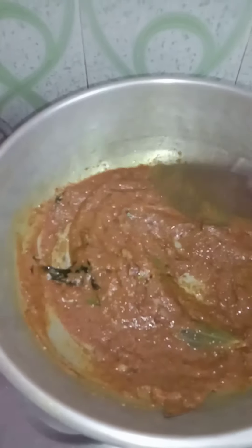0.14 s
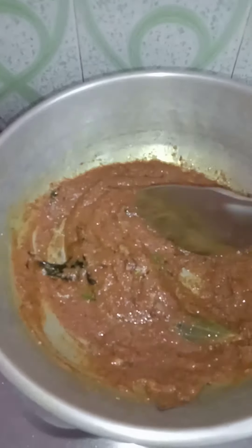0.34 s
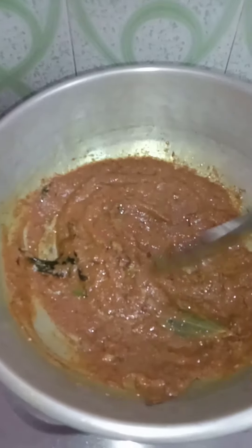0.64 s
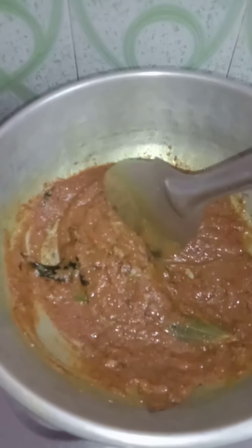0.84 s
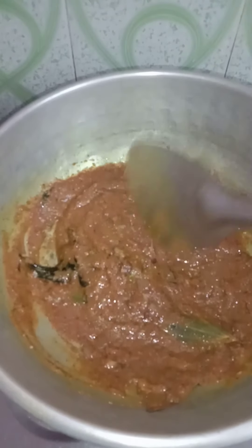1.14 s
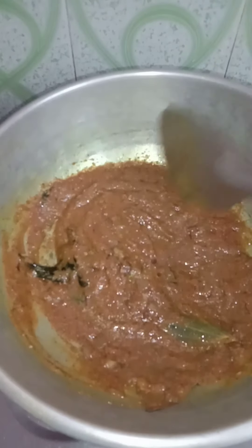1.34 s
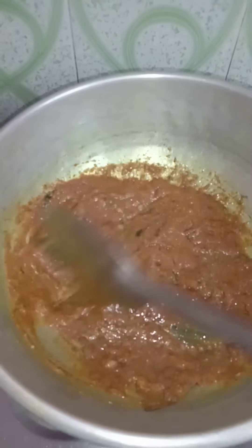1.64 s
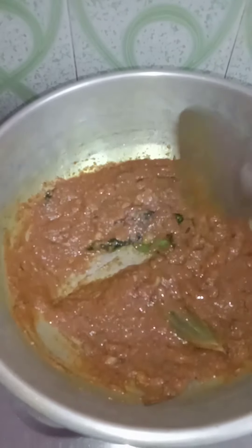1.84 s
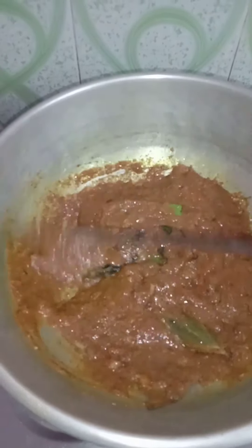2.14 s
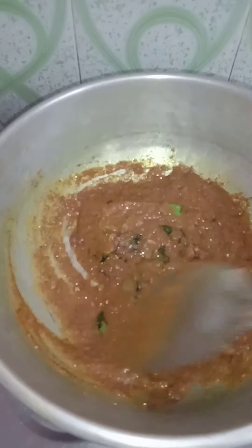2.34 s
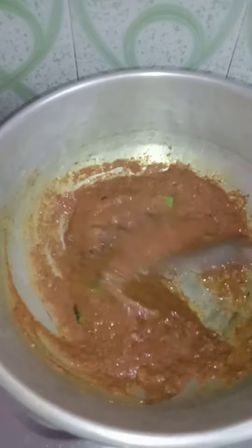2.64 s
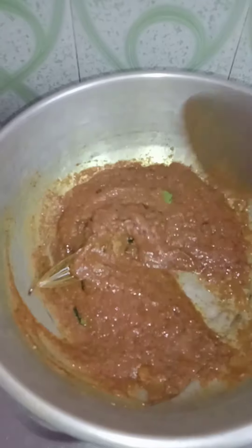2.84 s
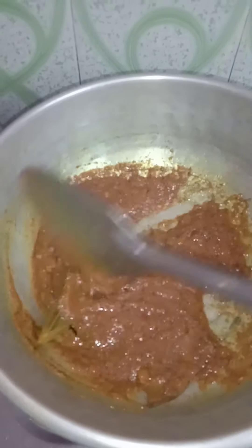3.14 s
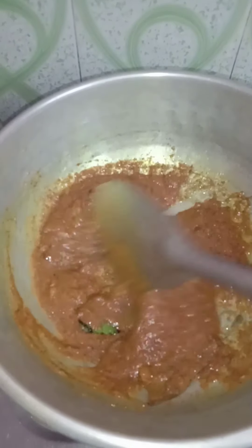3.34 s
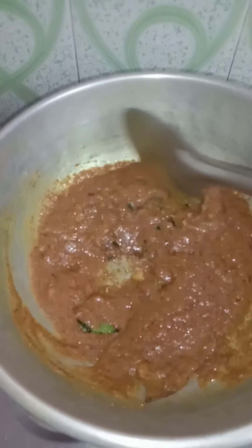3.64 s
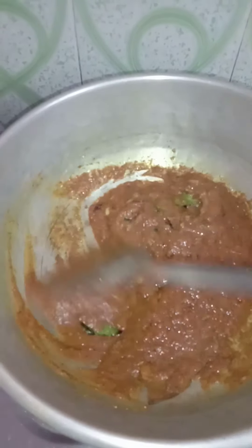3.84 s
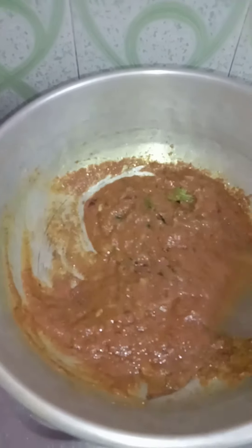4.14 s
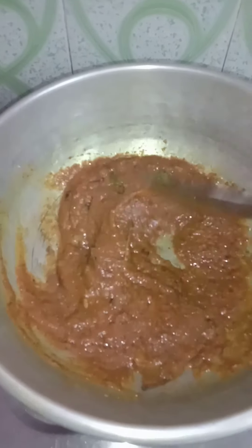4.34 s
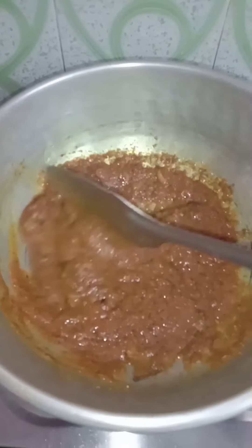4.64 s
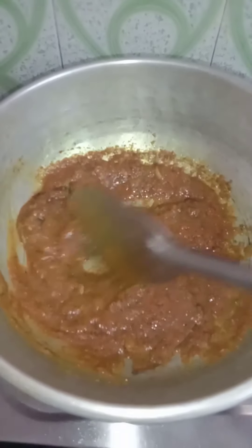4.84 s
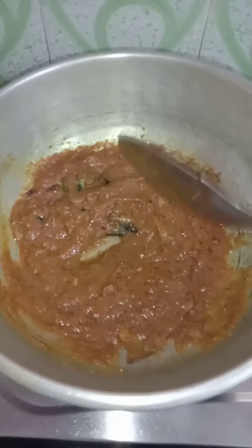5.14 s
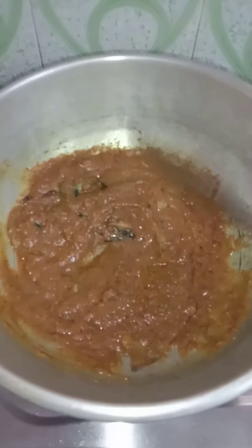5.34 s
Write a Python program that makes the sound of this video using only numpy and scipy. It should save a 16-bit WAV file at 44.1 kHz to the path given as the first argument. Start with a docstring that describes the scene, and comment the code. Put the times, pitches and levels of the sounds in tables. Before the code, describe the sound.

Stirring thick spice paste: soft smears, separate spoon clanks, brief gritty scrapes with small squeaks, and gentle frying crackle over low rumble.

```python
"""A metal spoon stirs thick paste in a wide metal pot: knocks, rasping drags, short squeaks, soft smears.
Knocks are filtered bursts, drags are filtered slips, squeaks are unsteady tones, smears are dense grains.
The paste fries gently: grains fizz, short decaying sines crackle and pop.
Pot modes ring briefly, a tiled kitchen answers with dense reflections, and a low rumble lies beneath."""
import sys
import numpy as np
from scipy import signal
from scipy.fft import rfft, irfft
from scipy.io import wavfile

SR = 44100
rng = np.random.default_rng(int(sys.argv[2]) if len(sys.argv) > 2 else 0)


def wrap_up_sound(samples):
    """Save the sound to the file named by the first command line argument, as 16-bit audio."""
    columns = np.atleast_2d(samples).T
    # keep every value between -1 and 1, then stretch to whole-number steps
    tamed = np.clip(columns, -1, 1)
    steps = np.round(tamed * 32767).astype(np.int16)
    wavfile.write(sys.argv[1], SR, steps)


N = 242991  # samples

# spoon meets pot; levels relative: t/s, hum of lowest mode/dB, boom f/Hz, boom/dB, thud/dB,
# spoon clack f/Hz, clack/dB, edge tick/dB, chatter decay constant/s
SPOON_KNOCKS = [(0.2205, -60, 359, -22, -30.5, 1930, -23, -22.5, 0.0052),
                (1.3028, -30.5, 326, -26, -20, 2350, -32, -23.5, 0.0018),
                (2.0227, -72, 365, -34, -48, 1560, -36, -28.5, 0.021),
                (2.4151, -31.5, 293, -36.5, -36.5, 2250, -23, -27, 0.0093),
                (2.8178, -34.5, 270, -29.5, -33, 1430, -26, -20.5, 0.0071),
                (2.8440, -62, 346, -61, -37, 1240, -34.5, -53, 0.002),
                (3.7191, -47, 463, -41.5, -43.5, 1500, -46, -56, 0.009),
                (4.0484, -55, 533, -28, -54, 2020, -29, -25, 0.0092),
                (4.1130, -59, 275, -38.5, -67, 1660, -42.5, -34, 0.0022),
                (4.3730, -63, 303, -24, -22.5, 1410, -35.5, -28.5, 0.0033),
                (4.7208, -35, 296, -31, -19.5, 2670, -29.5, -23, 0.0043)]
# boom, clack around their centres: f/centre, gain/dB
BOOM_SHAPE = [(0.12, -54), (0.45, -5), (0.75, 0.5), (1, 4.5), (1.3, -4.5), (2, -5.5), (3, -20), (10, -49)]
CLACK_SHAPE = [(0.05, -23), (0.4, -15.5), (0.7, -9.5), (1, 1.5), (1.3, -13.5), (2, -14), (6, -18)]
# base thud, edge tick: f/Hz, gain/dB
THUD_SPECTRUM = [(40, -43.5), (110, -12), (250, -9.5), (450, -0.5), (720, 0), (1100, -3.5), (1350, -12),
                 (1800, -17), (4000, -31.5), (12000, -101)]
TICK_SPECTRUM = [(100, -36), (1500, -24), (2500, -2.5), (3600, 1.5), (5500, 1.5), (7600, -2), (16000, -20)]
HUM_RISE_S = 0.0085  # the lowest mode takes a few cycles to build up


def knocks():
    """The base booms and thuds, the spoon clacks and ticks, and the lowest mode hums on."""
    out = np.zeros(N)
    t = np.arange(SR) / SR
    mode_hz, _, mode_t60_s = POT_MODES[0]
    hum = np.sin(2 * np.pi * mode_hz * t) * amp(-60 * t / mode_t60_s)
    hum *= 1 - np.exp(-t / HUM_RISE_S)
    for s, hum_db, boom_hz, boom_db, thud_db, clack_hz, clack_db, tick_db, fade_s in SPOON_KNOCKS:
        boom = amp(boom_db) * contact(centred(BOOM_SHAPE, boom_hz), chatter=0.57, fade_s=fade_s)
        thud = amp(thud_db) * contact(THUD_SPECTRUM, chatter=0.61, fade_s=fade_s)
        clack = amp(clack_db) * contact(centred(CLACK_SHAPE, clack_hz), chatter=3.8, fade_s=fade_s)
        tick = amp(tick_db) * contact(TICK_SPECTRUM, chatter=12, fade_s=fade_s)
        add(out, s, amp(hum_db) * hum)
        add(out, s, kitchen(pot(boom, ring_db=-52), wet_db=2.0, gap_s=0.0082))
        add(out, s, kitchen(pot(thud, ring_db=-57.5), wet_db=4.0, gap_s=0.005))
        add(out, s, kitchen(pot(clack, ring_db=-61), wet_db=1.5, gap_s=0.0046))
        add(out, s, kitchen(tick, wet_db=-1, gap_s=0.0087))
    return out


def contact(spectrum, chatter, fade_s, count=1024):
    """One sharp push plus decaying noise chatter; total energy equals 5 ms at rms 1."""
    t = np.arange(count) / SR
    force = rng.standard_normal(count) * np.exp(-t / fade_s)
    force *= chatter / np.linalg.norm(force)
    force[0] += 1
    push = colour(force, spectrum)
    return push / np.linalg.norm(push) * np.sqrt(SR / 200)


# edge drags on bare metal, levels relative: t/s, length/s, rasp/dB, base groan/dB
EDGE_SCRAPES = [(2.019, 0.14, -35.5, -36.5), (2.417, 0.1457, -31.5, -35.5), (2.842, 0.049, -34, -30),
                (3.716, 0.02, -36, -38.5), (4.104, 0.0555, -34, -40), (4.429, 0.075, -39, -35.5)]
# rasp of the edge: f/Hz, gain/dB
RASP_SPECTRUM = [(100, -63), (900, 5.5), (1800, -6.5), (3000, -5.5), (5000, 0.5), (7600, 0), (16000, -11)]
# modes of the spoon's bowl: f/Hz, width/Hz, level above plain rasp/dB
SPOON_MODES = [(1587, 27, 6), (2140, 120, 5), (2840, 98, 4), (3320, 160, 1), (5630, 280, -7),
               (6270, 230, 6.5)]
GROAN_FADE_DB, RASP_GROW_DB = -5.5, 4.5  # over a stroke, as the weight comes off the spoon
CATCH_DB, CATCH_HZ = 2.5, 35  # the edge catches and lets go
GRIT_DB, GRIT_PER_S = -5.5, 170  # coarse bits of spice caught under the edge


def scrapes():
    """Dense uneven slips ring the spoon and shake the base; the groan gives way to the rasp."""
    out = np.zeros(N)
    count = SR // 5
    for s, length_s, rasp_db, groan_db in EDGE_SCRAPES:
        u = np.clip(np.arange(count) / SR / length_s, 0, 1)  # progress of the stroke
        unevenness_db = 2.0 * wander(count, hz=144) + CATCH_DB * wander(count, hz=CATCH_HZ)
        pressure = np.sqrt(np.clip(16 * u * (1 - u), 0, 1)) * amp(unevenness_db)
        fine = grains(count, per_s=2400, spread_db=1.0) + 0.25 * rng.standard_normal(count)
        grit = grains(count, per_s=GRIT_PER_S, spread_db=3.5)
        slips = unit(fine) + amp(GRIT_DB) * unit(grit)
        ringing = resonant(colour(slips, RASP_SPECTRUM), SPOON_MODES)
        rasp = amp(rasp_db + RASP_GROW_DB * u) * unit(walls(ringing, share=0.2))
        groan = amp(groan_db + GROAN_FADE_DB * u) * unit(colour(slips, THUD_SPECTRUM))
        add(out, s, kitchen(pot((rasp + groan) * pressure, ring_db=-58.0), wet_db=-4))
    return amp(-2.4) * out


# edge catches and sings, levels relative: t/s, length/s, start f/Hz, end f/Hz, level/dB
EDGE_SQUEAKS = [(2.021, 0.032, 946, 946, -31), (2.068, 0.038, 983, 944, -28),
                (2.118, 0.053, 1043, 1105, -36.5), (2.414, 0.024, 3446, 3330, -19.5),
                (2.417, 0.037, 1594, 1573, -25.5), (2.47, 0.038, 1102, 1070, -31),
                (2.475, 0.012, 1640, 1675, -28), (2.518, 0.06, 3856, 2240, -29),
                (2.84, 0.063, 1184, 1160, -36)]
WAVER, WAVER_PER_OCTAVE = 0.044, 0.124  # rms share of pitch; a sliding squeak is rougher


def squeaks():
    """For a moment the slips lock into a rough, unsteady tone."""
    out = np.zeros(N)
    t = np.arange(SR // 8) / SR
    for s, length_s, start_hz, end_hz, db in EDGE_SQUEAKS:
        u = np.clip(t / length_s, 0, 1)
        waver = WAVER + WAVER_PER_OCTAVE * abs(np.log2(end_hz / start_hz))
        glide_hz = start_hz + (end_hz - start_hz) * u
        hz = glide_hz * (1 + waver * wander(len(t), hz=500))
        phase = 2 * np.pi * np.cumsum(hz) / SR
        wave = np.sin(phase) + amp(-23) * np.sin(2 * phase)
        tone = unit(wave * amp(3.5 * wander(len(t), hz=250)))
        envelope = np.sqrt(np.clip(6 * u * (1 - u), 0, 1))
        add(out, s, kitchen(amp(db) * tone * envelope, wet_db=-7.5))
    return amp(-5) * out


# spoon pushes paste onto hot metal, levels relative: deepest push t/s, build-up/s,
# sizzle flare/dB, smear/dB
PASTE_PUSHES = [(0.029, 0.051, -46, -49), (0.44, 0.053, -42.5, -52), (0.598, 0.017, -57.5, -39),
                (0.72, 0.05, -44, -37), (0.764, 0.042, -43, -44.5), (1.0, 0.032, -46.5, -51.5),
                (1.61, 0.061, -50.5, -48), (1.862, 0.12, -42.5, -61), (2.68, 0.093, -46.5, -66),
                (3.32, 0.044, -57, -50.5), (3.57, 0.11, -53, -55), (4.23, 0.025, -56, -63),
                (5.422, 0.046, -51.5, -48.5)]
# rub of the paste: f/Hz, gain/dB
SMEAR_SPECTRUM = [(60, -23), (150, -2.5), (280, 2.5), (480, -4.5), (750, -15.5), (1500, -12), (6000, -57)]
SMEAR_RELEASE = 1.0  # in build-ups


def smear():
    """Each push rubs the paste: soft, dense grains."""
    effort = sum(amp(db) * swell(s, rise_s, SMEAR_RELEASE * rise_s) for s, rise_s, _, db in PASTE_PUSHES)
    return effort * unit(colour(grains(N, per_s=2700, spread_db=-3.0), SMEAR_SPECTRUM))


JUDDER_S, JUDDER_RISE_S, JUDDER_FALL_S = 1.08, 0.18, 0.13
JUDDER_DB = -38.5  # relative


def judder():
    """The spoon judders once over the base: an unsteady tone on the pot's lowest mode."""
    hz = POT_MODES[0][0] * (1 + 0.03 * wander(N, hz=60))
    wave = np.sin(2 * np.pi * np.cumsum(hz) / SR)
    tone = unit(wave * amp(1.8 * wander(N, hz=30)))
    return amp(JUDDER_DB) * swell(JUDDER_S, JUDDER_RISE_S, JUDDER_FALL_S) * tone


def stirring():
    """Smear and judder, answered by the kitchen."""
    return kitchen(amp(-4.5) * (smear() + judder()), wet_db=-3.5)[:N]


# modes of the loaded pot, levels relative: f/Hz, level/dB, t60/s
POT_MODES = [(161, -8, 0.85), (283, -5, 0.7), (335, -2, 0.45), (468, -6, 0.4), (648, -4, 0.3),
             (743, -1, 0.3), (969, -3, 0.3), (1043, -2, 0.35), (1140, -3, 0.3), (1214, 0, 0.4),
             (1588, -6, 0.35), (1755, -6, 0.4), (2484, -8, 0.5), (3358, -8, 0.3)]


def pot(x, ring_db):
    """The push plus the short ring of the pot; each contact point favours other modes."""
    t = np.arange(SR * 3 // 4) / SR
    shares = rng.uniform(1 / 2, 1, len(POT_MODES))
    ring = np.zeros(len(t))
    for share, (hz, db, t60_s) in zip(shares, POT_MODES):
        ring += share * amp(db - 60 * t / t60_s) * np.cos(2 * np.pi * hz * t)
    ring *= amp(ring_db)
    ring[0] += 1
    return signal.fftconvolve(x, ring)


def walls(x, share, count=5):
    """A few echoes within 3 ms from the pot's wall colour each contact differently."""
    taps = np.zeros(SR * 3 // 1000)
    taps[rng.integers(len(taps) // 8, len(taps), count)] = share * rng.choice([-1, 1], count)
    taps[0] = 1
    return np.convolve(x, taps / np.linalg.norm(taps))[:len(x)]


# larger bubbles burst, levels relative: t/s, level/dB, f/Hz
BUBBLE_POPS = [(0.0617, -22.5, 5600), (0.734, -19, 4100), (0.9897, -29, 3160), (1.751, -27.5, 3270),
               (3.257, -27, 5700), (4.6672, -26.5, 3290), (5.0744, -29, 3430), (5.1179, -32.5, 2707),
               (5.274, -27, 3130), (5.3167, -22, 4700), (5.3992, -23.5, 5000)]
# fine fizz: f/Hz, gain/dB
SIZZLE_SPECTRUM = [(100, -42), (850, -6), (1200, 4.5), (2050, -1.5), (2900, -1.5), (4500, 3.5), (7600, 4.5),
                   (12000, -1), (15500, 2)]
SIZZLE_DB, DRYING_DB_PER_S = -50.5, -0.28  # relative; the steady frying sinks as the paste dries
FLARE_RELEASE = 0.85  # in build-ups


def frying(count=24):
    """Fine fizz, clumps of small bubbles of many pitches, single larger pops; each push makes it flare."""
    steady = amp(SIZZLE_DB + DRYING_DB_PER_S * np.arange(N) / SR)
    flares = sum(amp(db) * swell(s, rise_s, FLARE_RELEASE * rise_s) for s, rise_s, db, _ in PASTE_PUSHES)
    level = np.hypot(steady, flares) * amp(1.46 * wander(N, hz=25.8))
    fizz = unit(colour(grains(N, per_s=5000, spread_db=2.5), SIZZLE_SPECTRUM))
    crackle = np.zeros(N)
    for hz in np.geomspace(2700, 5900, count):
        bursts = grains(N, per_s=45, spread_db=2.8) * amp(3.5 * wander(N, hz=14))
        crackle += signal.oaconvolve(bursts, walls(bubble(hz, cycles=1.9), share=0.38))[:N]
    out = level * (amp(0.5) * fizz + amp(-4) * unit(crackle))
    for s, db, hz in BUBBLE_POPS:
        add(out, s, amp(db - 2.5) * walls(bubble(hz, cycles=2.1), share=0.45))
    return kitchen(out, wet_db=-7.0)[:N]


def bubble(hz, cycles):
    """A bubble bursts at once and rings for a few cycles."""
    turns = np.arange(512) / SR * hz
    return np.sin(2 * np.pi * turns) * np.exp(-turns / cycles)


# low background: f/Hz, gain/dB
RUMBLE_SPECTRUM = [(20, -20), (45, -21), (75, -4.5), (105, 3), (150, -8.5), (250, -15.5), (600, -21),
                   (3000, -33.5)]
RUMBLE_DB = -57.5  # steady part, before its wander
ROCK_DB, ROCK_RISE_S, ROCK_FALL_S = -17, 0.055, 0.32  # the pot rocks on the stove; dB relative to its hum
JUDDER_ROCK_DB, JUDDER_ROCK_S = -52.5, 0.62  # level, build-up of the rocking that leads into the judder


def rumble():
    """Low, restless noise that swells whenever the spoon sets the pot rocking on the stove."""
    rocking = amp(JUDDER_ROCK_DB) * swell(JUDDER_S, JUDDER_ROCK_S, JUDDER_FALL_S)
    for s, hum_db, *_ in SPOON_KNOCKS:
        rocking += amp(hum_db + ROCK_DB) * swell(s + ROCK_RISE_S, ROCK_RISE_S, ROCK_FALL_S)
    noise = unit(colour(rng.standard_normal(N), RUMBLE_SPECTRUM))
    return np.hypot(amp(RUMBLE_DB), rocking) * noise * amp(2.6 * wander(N, hz=8))


# decay of the tiled room: f/Hz, t60/s
KITCHEN_DECAY = [(100, 0.71), (320, 0.52), (900, 0.49), (2200, 0.58), (6000, 0.34), (15000, 0.62)]


def kitchen(x, wet_db, gap_s=0.0015):
    """The sound plus dense reflections from tiles, each band dying at its own speed."""
    count = SR * 3 // 4
    taps = rng.choice([-1., 1.], count) * (rng.random(count) < 1 / 8)
    hz, t, bands = signal.stft(taps, SR, nperseg=256)
    decay = amp(-60 * t / read(KITCHEN_DECAY, hz)[:, None])
    tail = signal.istft(bands * decay, SR, nperseg=256)[1]
    tail *= np.clip(np.arange(len(tail)) / SR / gap_s - 1 / 2, 0, 1)  # fades in around the gap
    tail *= amp(wet_db) / np.linalg.norm(tail)
    tail[0] = 1
    return signal.fftconvolve(x, tail)


def amp(db):
    """Decibels to gain."""
    return 10 ** (np.asarray(db) / 20)


def unit(x):
    """Scales to rms 1."""
    return x / np.sqrt(np.mean(x ** 2) + 1e-20)


def read(points, hz):
    """Reads a table on a log-frequency axis."""
    f, value = np.transpose(points)
    return np.interp(np.log(hz + 1), np.log(f + 1), value)


def add(mix, s, sound):
    """Mixes a sound in at time s."""
    part = mix[max(round(s * SR), 0):][:len(sound)]
    part += sound[:len(part)]


def colour(x, points, size=4096):
    """Causal minimum-phase filter with the given spectrum."""
    log_gain = np.log(amp(read(points, abs(np.fft.fftfreq(size, 1 / SR)))))
    taps = np.fft.ifft(np.exp(np.conj(signal.hilbert(log_gain)))).real
    return signal.oaconvolve(x, taps[:size // 2])[:len(x)]


def centred(shape, hz):
    """Places a spectrum at a centre frequency."""
    return np.array(shape) * [hz, 1]


def resonant(x, peaks):
    """The sound plus a few resonances."""
    return x + sum(amp(db) * signal.lfilter(*signal.iirpeak(hz, hz / width_hz, SR), x)
                   for hz, width_hz, db in peaks)


def wander(count, hz):
    """Random drift of about rms 1, rolling off above the given rate."""
    padded = count + SR // 4
    f = np.fft.rfftfreq(padded, 1 / SR)
    spectrum = rfft(rng.standard_normal(padded)) / (1 + (f / hz) ** 4)
    return unit(irfft(spectrum))[:count]


def grains(count, per_s, spread_db):
    """Random clicks of either sign; a positive spread makes a few large, a negative one a few small."""
    hits = rng.random(count) < per_s / SR
    sizes = amp(spread_db * np.minimum(rng.exponential(1, count), 4))
    return hits * rng.choice([-1, 1], count) * sizes


def swell(s, rise_s, fall_s):
    """A rounded build-up to gain 1 at time s, then an exponential decay."""
    t = np.arange(N) / SR - s
    return np.exp(-(np.minimum(t, 0) / rise_s) ** 2 - np.maximum(t, 0) / fall_s)


# air resonances of the open pot: f/Hz, width/Hz, level above direct path/dB
POT_AIR = [(1228, 151, 9), (1634, 34, 4.5), (2520, 560, -7), (5770, 130, -5)]


def scene():
    """The air in the pot colours all that sounds inside it; both channels hear the same."""
    inside = knocks() + scrapes() + squeaks() + stirring() + frying()
    sound = amp(-1.5) * resonant(inside, POT_AIR) + rumble()
    return np.array([sound, sound])


# microphone response: f/Hz, gain/dB
MICROPHONE_RESPONSE = [(20, -2), (6000, 0), (6600, -6.5), (7200, 3.5), (7800, 0), (8600, -8),
                       (11000, -11.5), (13700, -18.5), (15000, -6.5), (16000, -13)]
EDGE_HZ = 15800


def record(dry):
    """Microphone colour and faint self-noise, then the band limit."""
    heard = np.array([colour(channel, MICROPHONE_RESPONSE) for channel in dry])
    heard += amp(-82.5) * rng.standard_normal(dry.shape)
    lowpass = signal.firwin(511, EDGE_HZ, window=("kaiser", 9), fs=SR)
    return signal.oaconvolve(heard, lowpass[None], "same")


dry = scene()
out = record(dry)
wrap_up_sound(out)
```